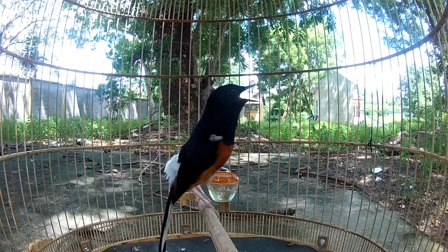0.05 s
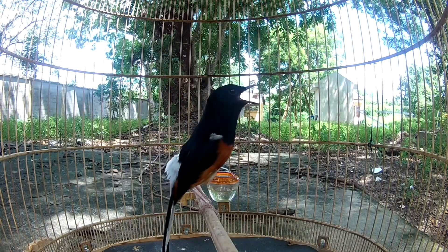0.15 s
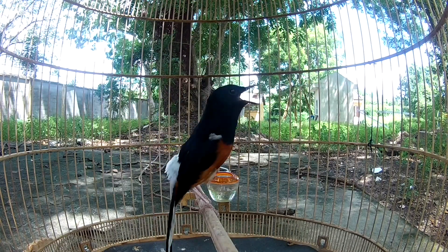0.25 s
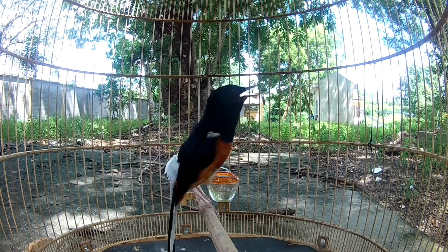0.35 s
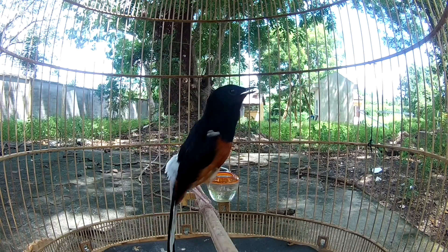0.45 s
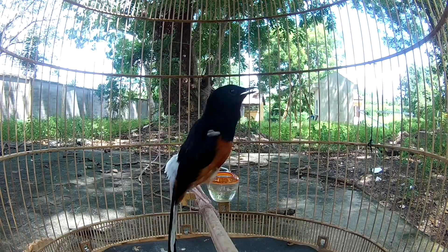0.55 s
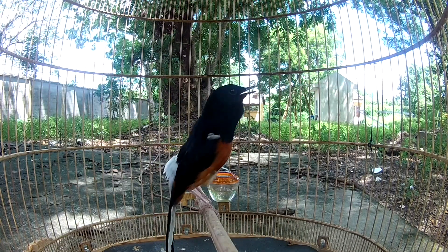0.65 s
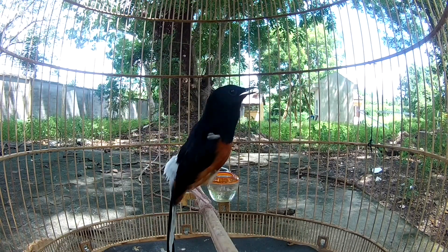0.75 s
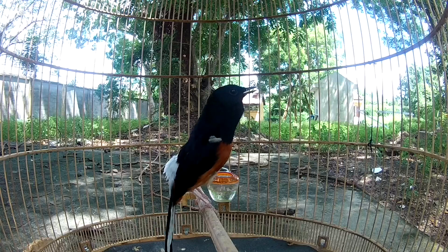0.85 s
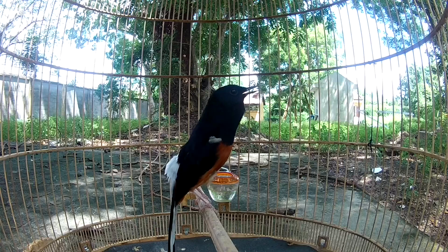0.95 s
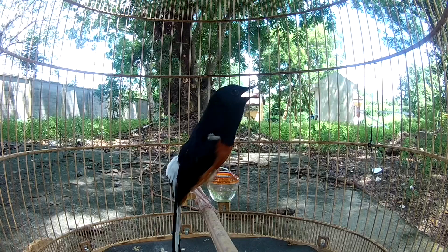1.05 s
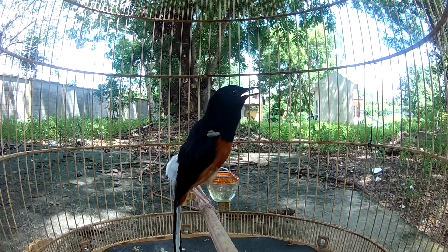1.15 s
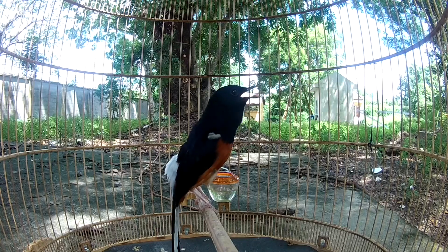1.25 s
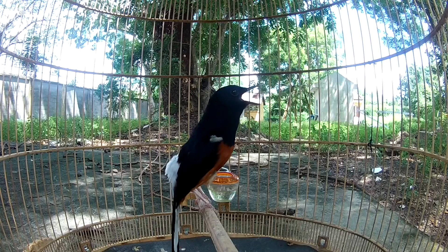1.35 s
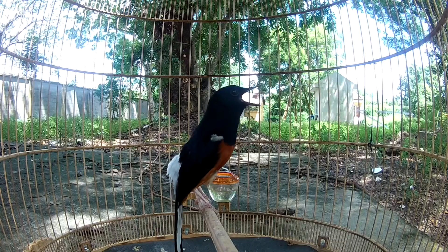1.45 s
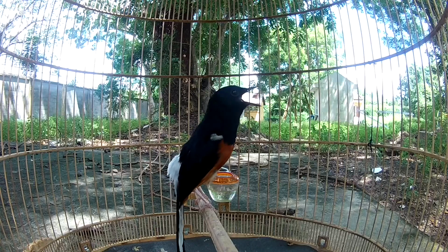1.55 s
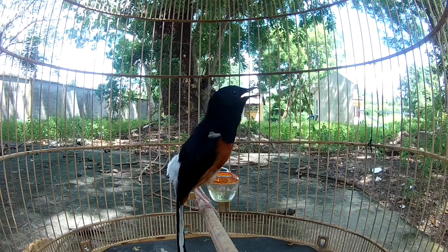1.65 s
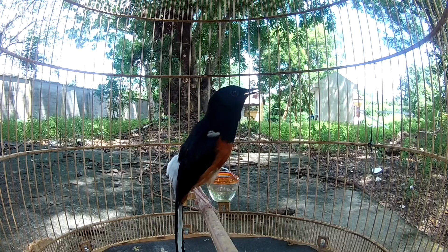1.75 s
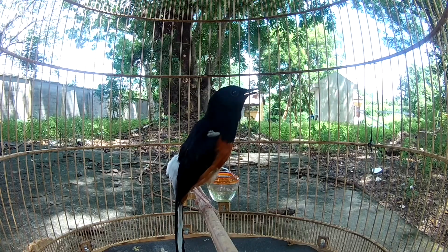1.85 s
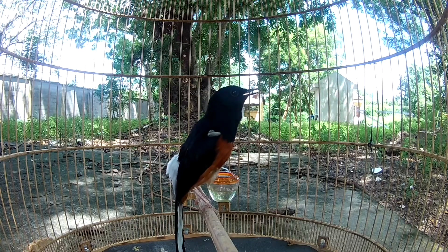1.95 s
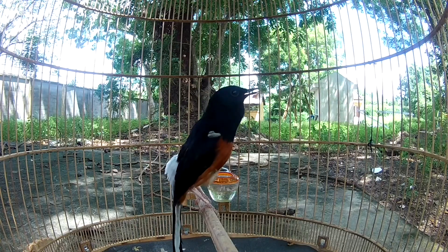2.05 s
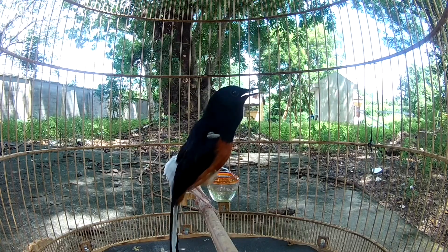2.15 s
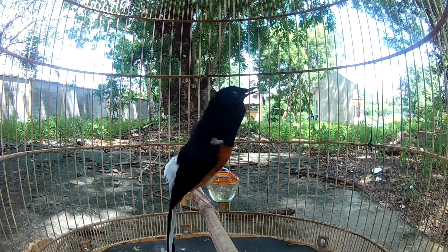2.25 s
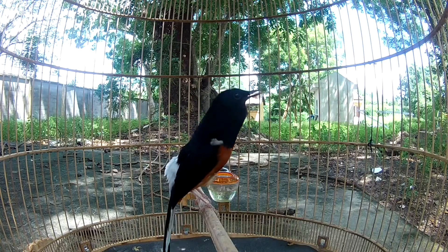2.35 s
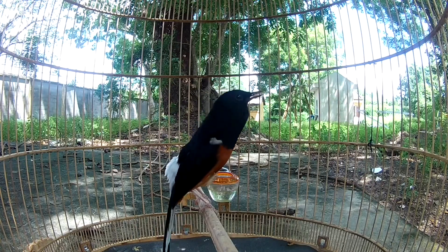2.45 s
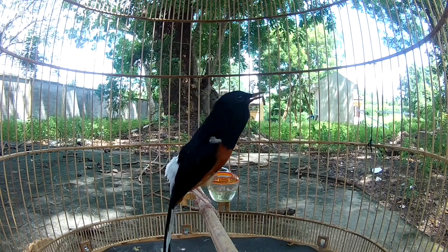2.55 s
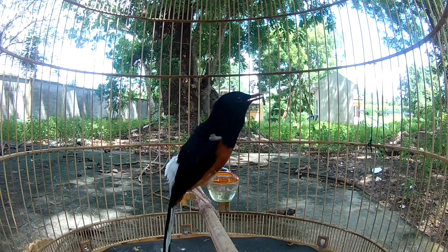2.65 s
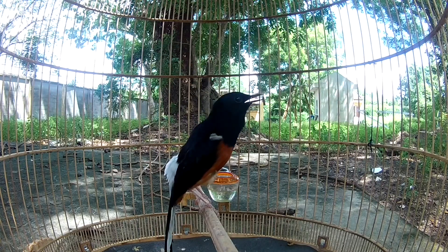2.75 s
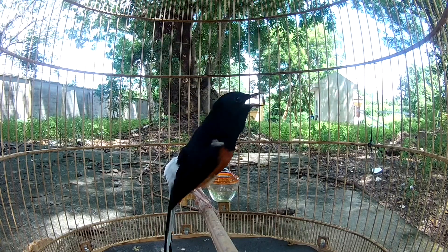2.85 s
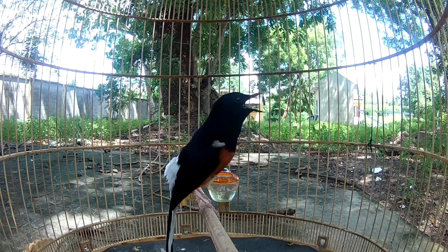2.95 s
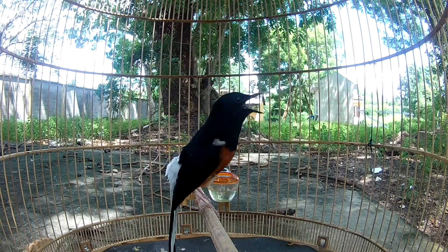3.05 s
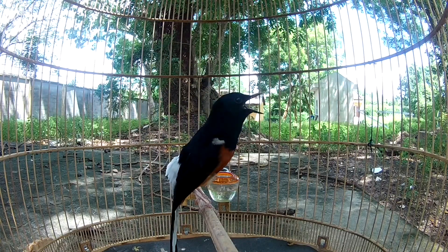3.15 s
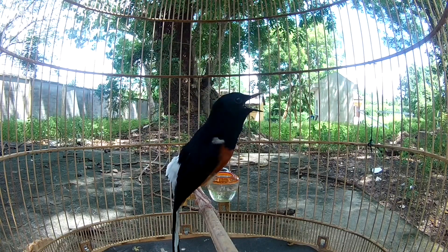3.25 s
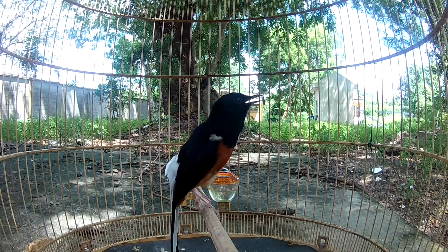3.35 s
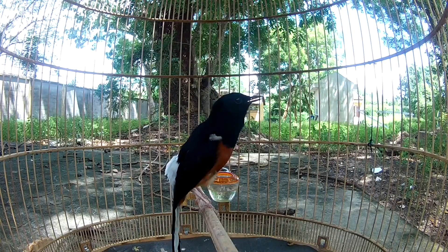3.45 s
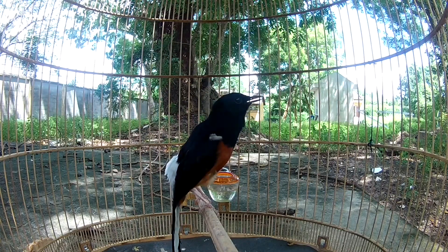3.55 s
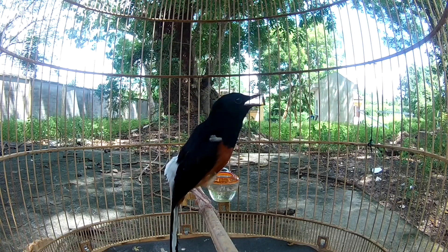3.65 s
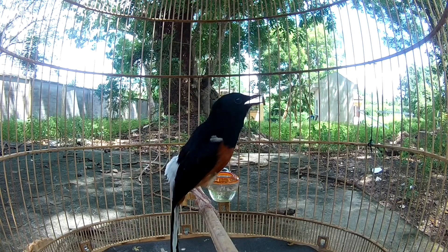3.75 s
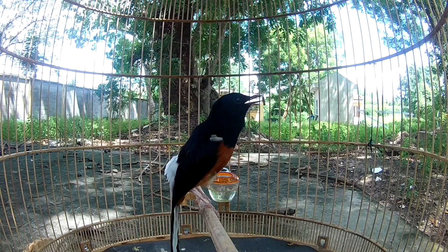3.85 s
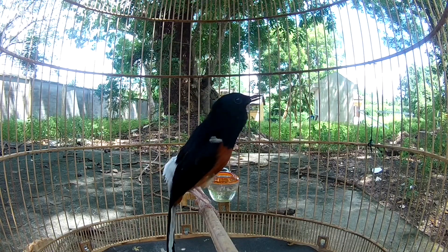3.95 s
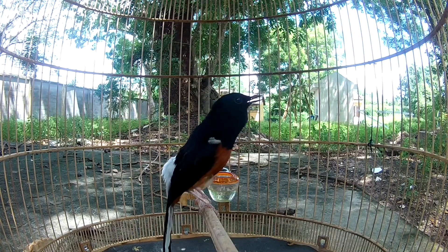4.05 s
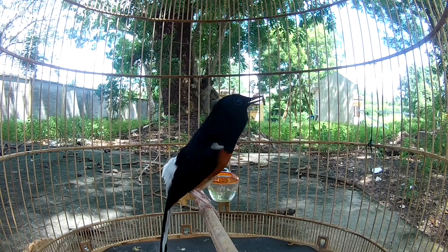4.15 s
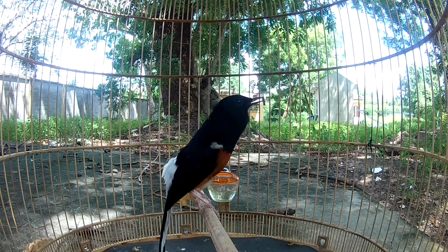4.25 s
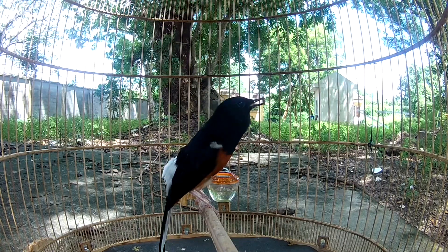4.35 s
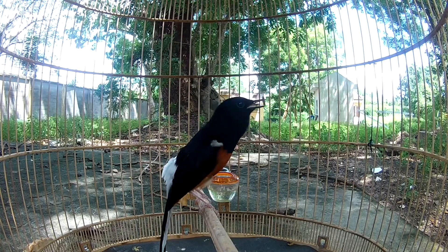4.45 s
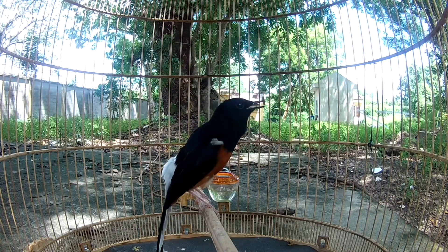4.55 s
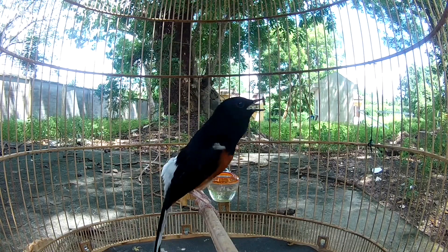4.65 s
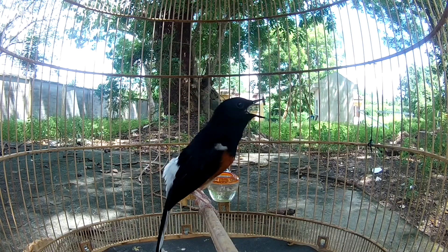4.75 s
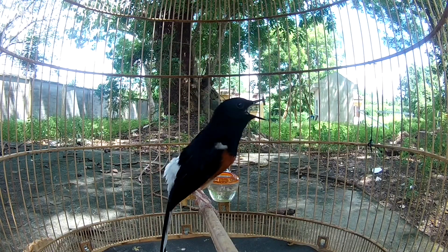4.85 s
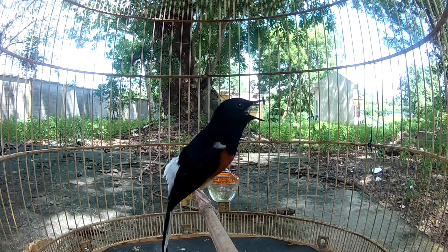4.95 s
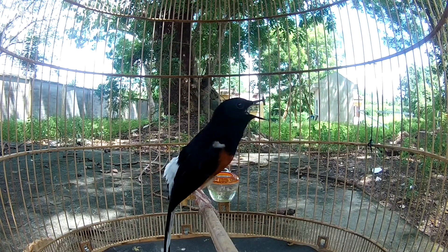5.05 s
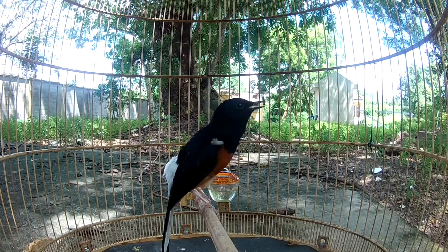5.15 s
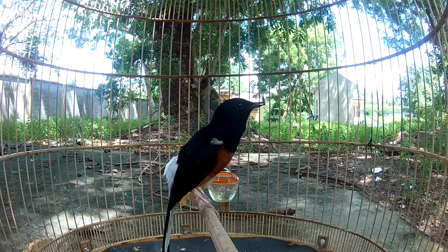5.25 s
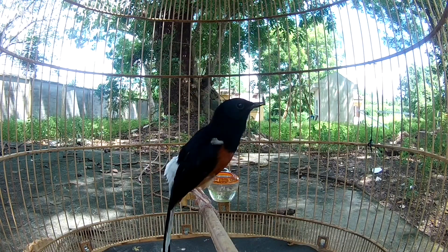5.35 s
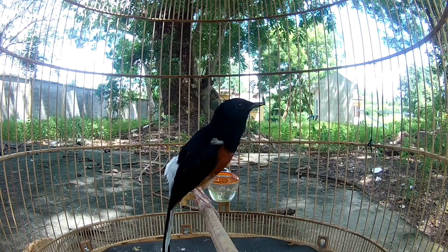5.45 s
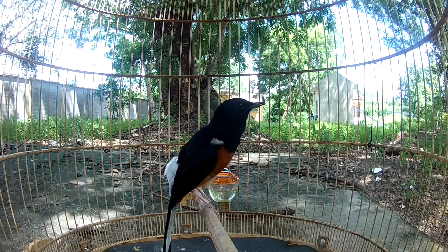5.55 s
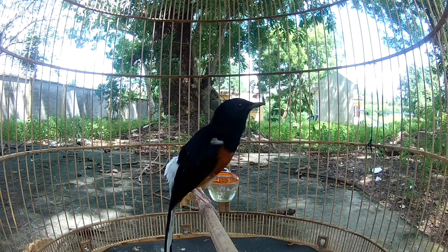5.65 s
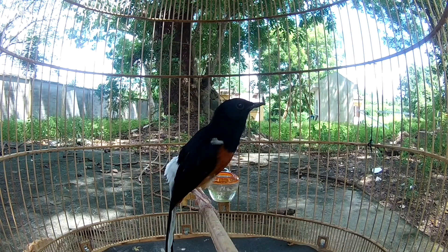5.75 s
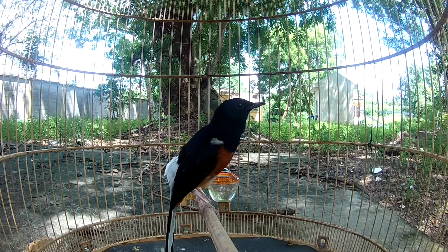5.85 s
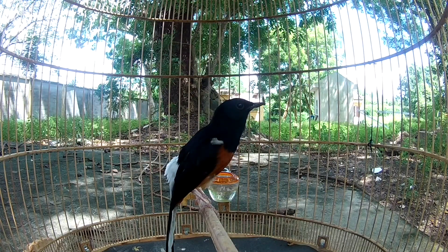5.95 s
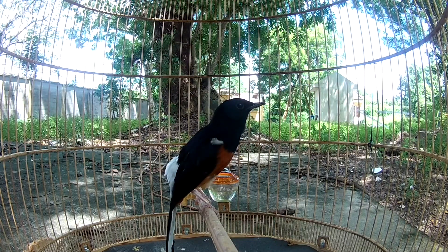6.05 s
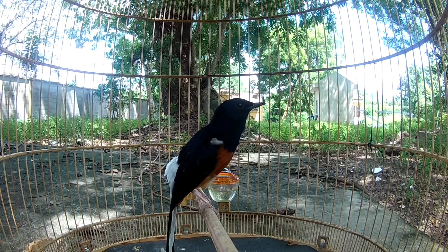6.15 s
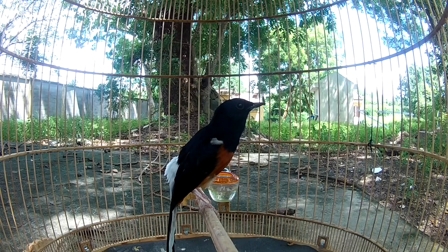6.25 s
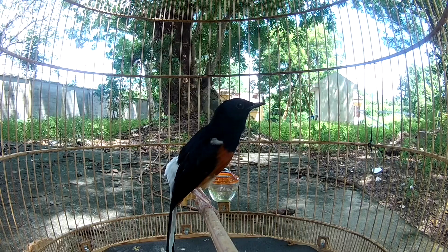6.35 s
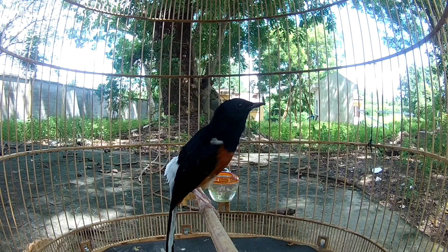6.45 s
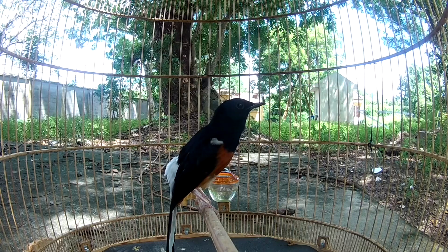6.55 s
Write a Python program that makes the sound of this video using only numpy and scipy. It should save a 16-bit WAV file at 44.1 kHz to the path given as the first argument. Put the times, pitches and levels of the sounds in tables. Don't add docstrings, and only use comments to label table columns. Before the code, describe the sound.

A songbird sings close to the microphone in a walled yard with trees, its notes trailing short diffuse echoes. The tail of a loud whistle opens, running into a quick rising trill and high zigzag warble until 0.4 s. Low, pure slurs fall and return at 0.7-1.1 s, while faint distant birds repeat a small figure until about 2 s. At 1.3 s a dipping whistle climbs into a tight trill and warble. A low cluck at 2.1 s leads to grunting, rattling chatter until 2.6 s. Another whistle, beaded trill and warble fill 2.8-3.3 s; a soft squeak comes at 3.7 s. Cluck and chatter return at 4.0-4.5 s, then the loudest whistle phrase at 4.7-5.1 s, slightly overloaded. After a pause, leaves rustle faintly from 5.7 s, and a soft, slowly rising whistle starts at 6.0 s, with a hoarse farther call at 6.4 s. A faint motor hum and low air rumble continue throughout.

```python
import sys
import numpy as np
from scipy import signal
from scipy.io import wavfile
from scipy.ndimage import uniform_filter1d

SR = 44100
rng = np.random.default_rng(int(sys.argv[2]) if len(sys.argv) > 2 else 0)


def undo_db(level):
    steps = np.asarray(level, float) / 20
    return 10 ** steps


def pcm_store(signal):
    levels = np.round(np.clip(np.atleast_2d(signal), -1, 1) * 32767)
    wavfile.write(sys.argv[1], SR, levels.astype(np.int16).T)


N = 291501
TIME = np.arange(N) / SR
YARD_DB = -24


def rms_one(x):
    return x / np.sqrt(np.mean(x ** 2) + 1e-20)


def drift(rate_hz):
    lowpass = signal.butter(4, rate_hz, fs=SR, output="sos")
    return rms_one(signal.sosfilt(lowpass, rng.standard_normal(N + SR))[SR:])


def band_noise(white, low_hz, high_hz):
    return signal.sosfilt(signal.butter(2, [low_hz, high_hz], "band", fs=SR, output="sos"), white)


def tone(hz, partials):
    phase = 2 * np.pi * np.cumsum(hz) / SR
    total = 0
    for k, height in partials:
        total = total + height * np.sin(k * phase + k * k) * (k * hz < 20000)
    return total


def motor():
    # multiple of the shaft rate, level in dB.
    harmonics = [(2, -52), (3, -68), (4, -67), (6, -70), (7, -61), (8, -57), (10, -66), (14, -68)]
    hz = 86.9 * (1 + .002 * drift(1.5))
    return tone(hz, [(k, np.sqrt(2) * undo_db(db + 1.5 * np.roll(drift(6), k))) for k, db in harmonics])


def banded_noise(spectrum, patchy_db, patch_rate_hz):
    out = 0
    edges_hz = 22 * 2 ** np.arange(0, 10, .5)
    white = rng.standard_normal((2, N + SR))
    hz, level_db = np.transpose(spectrum)
    together = drift(patch_rate_hz)
    for k, (low_hz, high_hz) in enumerate(zip(edges_hz, edges_hz[1:])):
        band = band_noise(white[k % 2], low_hz, high_hz)[SR:]
        own = np.roll(together, k * N // 19)
        band_db = np.interp(np.log(low_hz * high_hz) / 2, np.log(hz), level_db)
        out = out + band * undo_db(band_db + patchy_db * (.6 * together + own))
    return rms_one(out)


def air():
    # frequency in Hz, density in dB per Hz.
    air_colour = [(22, -14), (42, 0), (65, -1), (110, -6), (250, -12), (500, -15), (800, -15), (1050, -21),
                  (1400, -21), (2100, -28), (3200, -35), (5000, -41), (8000, -47), (14000, -46)]
    return undo_db(-53) * banded_noise(air_colour, patchy_db=.6, patch_rate_hz=5)


def throat(hz):
    # frequency in Hz, gain in dB.
    response = [(2300, 14), (3300, 0), (6500, 1), (7800, -2), (9500, -2), (11500, -9), (16000, -16)]
    corner_hz, gain_db = np.transpose(response)
    return undo_db(np.interp(np.log(hz), np.log(corner_hz), gain_db))


def glide(rows, edge_s):
    s, hz, *levels_db = np.transpose(rows)
    gate = np.clip(np.minimum(TIME - s[0] + edge_s, s[-1] + edge_s - TIME) / edge_s, 0, 1)
    on = gate > 0
    pitch_hz, *heights = [uniform_filter1d(np.interp(TIME[on], s, column), size=133, mode="nearest")
                          for column in (hz, *undo_db(np.array(levels_db)))]
    return on, pitch_hz, [gate[on] * height for height in heights]


def trill(start_s, end_s, bead_s, top_hz, joined):
    start_hz, level_db, swell_db, swell_s = 3040, -13.8, -6, .04
    gap_db, bead_arch, droop_s, droop = -24, .08, .019, .15
    on = (TIME > start_s) & (TIME < end_s)
    t = TIME[on] - start_s
    u = t / (end_s - start_s)
    apart = np.clip((joined - u) / .35, 0, 1)
    arch = np.abs(np.sin(np.pi * t / bead_s))
    cusp = 1 - np.abs(2 * (t / bead_s % 1) - 1)
    ending = np.clip(1 - (end_s - start_s - t) / droop_s, 0, 1) ** 2
    bead = bead_arch * (.45 + .65 * joined) * (cusp ** 1.6 - .45) + .006 * drift(150)[on]
    hz = start_hz + (top_hz - start_hz) * np.sin(1.4 * u)
    hz = hz * (1 + bead * (1 - .5 * u) - droop * ending)
    db = level_db + swell_db * np.clip(1 - t / swell_s, 0, 1)
    db = db + gap_db * (.07 + apart) * (1 - arch) ** 1.8
    db = db - 40 * (ending ** 4 + np.clip(1 - t / .004, 0, 1)) + .8 * drift(90)[on]
    return on, uniform_filter1d(hz, size=67), [uniform_filter1d(undo_db(db), size=67)]


def whistles(upper_power=.6, flutter_db=.5, broken_db=3):
    # time in seconds, pitch in Hz, crest in dB.
    scooped = [
        [(0, 2340, -3), (.018, 2580, -19), (.032, 2700, -23), (.06, 2740, -22), (.086, 2770, -24),
         (.101, 2800, -39), (.116, 2860, -31), (.135, 3030, -37)],
        [(1.272, 2530, -46), (1.286, 2650, -29), (1.293, 2580, -18), (1.316, 2290, -3), (1.335, 2280, .4),
         (1.367, 2490, -3.2), (1.385, 2700, -18), (1.405, 2880, -28), (1.444, 3040, -22)],
        [(2.84, 2500, -32), (2.854, 2590, -25), (2.87, 2420, -7), (2.888, 2290, -2.4), (2.905, 2320, -.9),
         (2.93, 2470, -2.0), (2.949, 2650, -11), (2.964, 2740, -17), (3.014, 2990, -31)],
        [(4.652, 2180, -50), (4.668, 2370, -19.5), (4.69, 2230, 0), (4.71, 2200, 1.8), (4.74, 2420, .5),
         (4.755, 2590, -7), (4.772, 2710, -12.4), (4.834, 2890, -28), (4.851, 3020, -24)],
    ]
    # time in seconds, pitch in Hz, crest in dB.
    slurs = [
        [(.678, 2030, -50), (.685, 2070, -26), (.7, 1910, -12.5), (.718, 1740, -15), (.729, 1610, -23),
         (.735, 1560, -9), (.741, 1420, -3.7), (.754, 1170, -12), (.768, 1120, -35)],
        [(.864, 1700, -35), (.885, 1630, -25), (.91, 1450, -4.5), (.937, 1170, -6.2), (.966, 1130, -11),
         (1.005, 1500, -5.0), (1.018, 1580, -8.0), (1.059, 1630, -8.8), (1.071, 1740, -24)],
        [(1.071, 1740, -24), (1.084, 1750, -8.3), (1.093, 2010, -2.5), (1.098, 2400, -18), (1.104, 2190, -1.9),
         (1.109, 2100, -30)],
    ]
    # start and end in seconds, bead in seconds, top in Hz, share before beads join.
    trills = [
        (.14, .221, .0197, 3420, .1),
        (1.449, 1.549, .017, 3600, 0.05),
        (3.0185, 3.183, .0185, 3800, .85),
        (4.855, 5.012, .0192, 3720, .72),
    ]
    # multiple of pitch, level in dB.
    whistle_partials = [(1, 0), (2, -52), (3, -63), (4, -60), (5, -66)]
    out = np.zeros(N)
    flutter = undo_db(.3 + flutter_db * drift(70))
    broken = broken_db * drift(60)
    stutter_db = -22 * np.sin(np.pi * 70 * TIME) ** 2
    notes = [glide(rows, edge_s=.003) for rows in scooped + slurs] + [trill(*row) for row in trills]
    for on, hz, (main,) in notes:
        opening_db = np.clip((hz - 2900) / 60, 0, 6)
        partials = []
        for k, db in whistle_partials:
            overtone_db = db + opening_db + np.roll(broken, 999 * k)[on]
            upper = main ** upper_power * throat(k * hz) * undo_db(overtone_db)
            partials.append((k, main if db == 0 else upper))
        tail = np.clip(1 - main / .11, 0, 1) * np.clip((hz - 2700) / 150, 0, 1)
        unsteady = flutter[on] ** np.clip(1.5 - main, 0, 1)
        out[on] += unsteady * tone(hz, partials) * undo_db(stutter_db[on] * tail)
    return out


def yard(x):
    quick_t60_s, slow_t60_s, slow_db, gap_s = .36, 1.2, -36, .011
    t = np.arange(int(1.5 * SR)) / SR
    quick, slow = (rms_one(undo_db(-60 * t / t60_s)) / np.sqrt(len(t)) for t60_s in (quick_t60_s, slow_t60_s))
    onset = np.clip(t / gap_s - 1, 0, 1)
    response = rng.standard_normal(len(t)) * onset * (quick + undo_db(slow_db - YARD_DB) * slow)
    response = signal.lfilter(*signal.butter(1, 1100, "high", fs=SR), response)
    return signal.fftconvolve(x, response)[:N]


def puffs(rows, partials, stretch, crest, roundness, upper_power, rough=0, rasp_db=0):
    hz, swell = np.zeros(N), np.zeros(N)
    for s, length_s, start_hz, middle_hz, end_hz, crest_db in rows:
        first = max(int((s - stretch * length_s) * SR), 0)
        at = slice(first, min(int((s + (1 + stretch) * length_s) * SR), N))
        u = np.clip(2 * (TIME[at] - s) / length_s - 1, -1, 1)
        pitch_hz = middle_hz + (end_hz - start_hz) / 2 * u + ((start_hz + end_hz) / 2 - middle_hz) * u * u
        through = np.linspace(0, 1, len(u)) ** (np.log(.5) / np.log(np.clip(crest, .1, .9)))
        shape = undo_db(crest_db) * np.abs(np.sin(np.pi * through)) ** roundness
        hz[at] = np.where(shape > swell[at], pitch_hz, hz[at])
        swell[at] = np.maximum(shape, swell[at])
    on = swell > 0
    hz = uniform_filter1d(np.interp(TIME, TIME[on], hz[on]), size=89) * (1 + rough * drift(250))
    top = swell.max()
    rasp = rasp_db * drift(380)
    upper = uniform_filter1d(top * (swell / top) ** upper_power, size=133)
    swell = uniform_filter1d(swell, size=67)
    heights = []
    for k, db in partials:
        if k == 1:
            height = swell * undo_db(rasp + db)
        else:
            weak = db < 0
            height = upper * throat(k * hz) ** weak * undo_db(db + 2.5 * weak * np.roll(rasp, 99 * k))
        heights.append((k, height))
    return tone(hz, heights)


def zigzags():
    # start in seconds, length in seconds, bottom in Hz, crest in dB.
    scoops = [(.2205, .009, 2630, -26), (.2749, .0175, 2050, -16.5), (.3292, .018, 2080, -18),
              (1.549, .01, 2430, -21), (1.6034, .0125, 2260, -19), (3.18, .009, 2850, -24),
              (3.233, .0185, 2080, -19), (3.2898, .006, 2350, -28), (5.0111, .021, 2100, -17),
              (5.0665, .022, 2090, -18)]
    # start in seconds, length in seconds, top in Hz, crest in dB.
    rises = [(.2325, .0334, 4070, -12.3), (.2943, .026, 4350, -15.3), (.3497, .025, 3950, -16),
             (1.561, .0314, 4200, -13), (1.6183, .026, 4200, -15.6), (3.1901, .0309, 4150, -13),
             (3.2529, .026, 4400, -14.4), (5.0326, .021, 4000, -13), (5.0889, .019, 3900, -16)]
    # start in seconds, top in Hz, crest in dB.
    falls = [(.2664, 3950, -15), (.3208, 4320, -18.4), (1.5929, 4270, -15.6), (3.2215, 4300, -15.3),
             (3.2809, 4290, -19), (5.055, 4170, -16)]
    # start in seconds, top in Hz, crest in dB.
    flicks = [
        (1.645, 5000, -34),
        (5.108, 4800, -36),
    ]
    # multiple of pitch, level in dB.
    warble_partials = [(1, 0), (2, -43), (3, -50), (4, -53)]
    rise_start_hz, shelf_hz, climb_db = 3060, 3470, -6
    fall_s, fall_end_hz, flick_s = .0095, 3120, .014
    scoop_in_hz, scoop_out_hz, scoop_least = 2640, 2830, 1.11
    up, climbs, down = [], [], []
    for s, length_s, hz, db in rises:
        up.append((s, .7 * length_s, rise_start_hz, .985 * shelf_hz, shelf_hz, db))
        climbs.append((s + .55 * length_s, .5 * length_s, shelf_hz, (shelf_hz + hz) / 2, hz, db + climb_db))
    up += climbs
    for s, hz, db in flicks:
        up.append((s, flick_s, .87 * hz, hz, .88 * hz, db))
    for s, length_s, hz, db in scoops:
        least_hz = scoop_least * hz
        down.append((s, length_s, max(scoop_in_hz, least_hz), hz, max(scoop_out_hz, least_hz), db))
    for s, hz, db in falls:
        down.append((s, fall_s, hz, (hz + fall_end_hz) / 2, fall_end_hz, db))
    rising = puffs(up, warble_partials, stretch=.07, crest=.4, roundness=.8, upper_power=.45,
                   rough=.006, rasp_db=.7)
    falling = puffs(down, warble_partials, stretch=.04, crest=.6, roundness=.55, upper_power=.45,
                    rough=.005, rasp_db=.6)
    return rising + falling


def far_birds():
    # offset in seconds, length in seconds, start, middle and end pitch in Hz, crest in dB.
    far_figure = [
        (0, .022, 5200, 4400, 3900, -56),
        (.135, .05, 2400, 2480, 2700, -55),
        (.183, .036, 2750, 3300, 2850, -51),
    ]
    figure_starts_s = [.623, 1.028, 1.432, 1.846]
    # start in seconds, length in seconds, start, middle and end pitch in Hz, crest in dB.
    far_calls = [
        (6.39, .03, 2700, 3400, 3800, -39),
        (6.41, .068, 3700, 3880, 3900, -31),
        (5.7, .06, 4000, 4150, 4000, -65),
        (5.95, .2, 2650, 2720, 2740, -60),
    ]
    figure = [(at + s, *shape, crest_db) for at in figure_starts_s for s, *shape, crest_db in far_figure]
    clear = puffs(figure, [(1, 0)], stretch=.1, crest=.5, roundness=.8, upper_power=1, rough=.004)
    hoarse = puffs(sorted(far_calls), [(1, 0)], stretch=.1, crest=.55, roundness=.8, upper_power=1,
                   rough=.028, rasp_db=2.2)
    return clear + hoarse


def clucks():
    # start in seconds, length in seconds, start, middle and end pitch in Hz, crest in dB.
    cluck_rows = [
        (2.103, .052, 520, 620, 530, -24),
        (3.985, .05, 560, 620, 540, -22),
        (6.008, .02, 560, 560, 540, -46),
    ]
    # multiple of pitch, level in dB.
    cluck_partials = [(1, -19), (2, 0), (3, -34), (4, -36)]
    return puffs(cluck_rows, cluck_partials, stretch=.05, crest=.55, roundness=1.1, upper_power=.9,
                 rough=.025, rasp_db=1.3)


def chatter_puffs():
    # high voice start and low voice start in seconds, tick spacing in seconds, crest in dB.
    openings = [
        (2.2345, 2.2659, .0132, -5.4),
        (4.111, 4.1409, .0137, -6.3),
    ]
    # start in seconds, low puff count, spacing in seconds, low and high voice levels in dB.
    bursts = [
        (2.3727, 2, .0249, -6.2, -17),
        (2.4345, 2, .0245, -7.7, -16),
        (2.4934, 2, .029, -9, -14),
        (2.5323, 4, .0215, -9.5, -21),
        (4.2512, 2, .024, -8.3, -13.7),
        (4.3105, 2, .025, -9.5, -13),
        (4.3689, 5, .0222, -11, -12),
    ]
    low_hz, high_hz, low_fade_db, high_fade_db, high_lag = 1095, 1550, 3.5, 8.0, .45
    tick_wait_s, tick_db, pip_db, pip_echo_s, pip_echo_db = .0335, -12, -5, .0217, -16
    low, high = [], []
    for pip_s, grunt_s, spacing_s, db in openings:
        high.append((pip_s, .02, .93 * high_hz, 1.035 * high_hz, 1.075 * high_hz, db + pip_db))
        high.append((pip_s + pip_echo_s, .0075, 1.07 * high_hz, 1.05 * high_hz, 1.06 * high_hz, db + pip_echo_db))
        low.append((grunt_s, .013, 1.19 * low_hz, 1.02 * low_hz, 1.02 * low_hz, db))
        low.append((grunt_s + spacing_s, .013, 1.08 * low_hz, 1.02 * low_hz, .98 * low_hz, db - 1.3))
        ticks_s = grunt_s + tick_wait_s
        for k in range(4):
            low.append((ticks_s + k * spacing_s, .007, 1.13 * low_hz, 1.06 * low_hz, 1.06 * low_hz, db + tick_db))
        for k in range(5):
            high.append((ticks_s + (k + .4) * spacing_s, .012, high_hz, high_hz, 1.04 * high_hz, db + 2 * tick_db))
    for s, count, spacing_s, low_db, high_db in bursts:
        for k in range(count):
            middle_hz = low_hz * (1.05 if k else .98)
            last = k == count - 1
            length_s = .0175 if k == 0 else .0115 if count < 3 else .021
            puff_db = low_db - low_fade_db * k / (count - 1)
            low.append((s + k * spacing_s, length_s, 1.19 * low_hz, middle_hz, 1.02 * low_hz, puff_db))
            fill_db = high_db - high_fade_db * last * (count - 1) - 1.2 * k
            fill_s = s + (k + high_lag) * spacing_s
            high.append((fill_s, .016, .96 * high_hz, high_hz, .975 * high_hz, fill_db))
    return low, high


def chatter(cluck_sound):
    # multiple of pitch, level in dB.
    low_partials = [(1, 0), (2, -36), (3, -49), (4, -55), (8, -57)]
    # multiple of pitch, level in dB.
    high_partials = [(1, 0), (2, -43), (3, -46)]
    low_puffs, high_puffs = chatter_puffs()
    low = puffs(low_puffs, low_partials, stretch=.06, crest=.25, roundness=1.1, upper_power=.9,
                rough=.016, rasp_db=1.2)
    high = puffs(high_puffs, high_partials, stretch=.04, crest=.3, roundness=.8, upper_power=.85,
                 rough=.008, rasp_db=.8)
    hiss = undo_db(8) * band_noise(rng.standard_normal(N), 1500, 2400)
    hiss += undo_db(1) * band_noise(rng.standard_normal(N), 3800, 4600)
    breath = undo_db(-32) * hiss * uniform_filter1d(np.abs(low + high + cluck_sound), size=89)
    return signal.sosfilt(signal.butter(6, 930, "high", fs=SR, output="sos"), low + high + breath)


def squeak():
    # start in seconds, length in seconds, start, middle and end pitch in Hz, crest in dB.
    squeak_rows = [
        (3.6755, .01, 1630, 2310, 2800, -32),
        (3.6865, .0135, 2800, 3000, 2950, -39),
        (3.7024, .0354, 2650, 2110, 3010, -26.4),
        (3.749, .02, 2910, 2480, 1860, -39),
    ]
    # multiple of pitch, level in dB.
    squeak_partials = [(1, 0), (2, -17), (3, -40)]
    return puffs(squeak_rows, squeak_partials, stretch=.1, crest=.5, roundness=1.1, upper_power=.5,
                 rough=.004, rasp_db=.6)


def leaves():
    # time in seconds, level in dB.
    gust = [
        (0, -90),
        (5.6, -88),
        (5.75, -57),
        (5.95, -54),
        (6.61, -53),
    ]
    # frequency in Hz, density in dB per Hz.
    leaf_colour = [(70, 13), (200, -3), (1500, -15), (3000, -30), (8000, -38), (15000, -32)]
    level = undo_db(np.interp(TIME, *np.transpose(gust)))
    return level * banded_noise(leaf_colour, patchy_db=2.5, patch_rate_hz=15)


def soft_whistle(waver=.005, flutter_db=.7, breaks_s=6.34, broken_db=3.5):
    # time in seconds, pitch in Hz, crest in dB, octave partial in dB.
    soft_note = [(6.008, 2220, -42, -82), (6.07, 2260, -24.4, -76), (6.187, 2340, -20.5, -63),
                 (6.272, 2420, -19.8, -56), (6.3, 2480, -27, -52), (6.322, 2420, -22, -53),
                 (6.4, 2520, -30, -49), (6.53, 2620, -30, -48), (6.56, 2640, -46, -85)]
    # multiple of pitch, level in dB.
    soft_partials = [(3, -48), (5, -52)]
    out = np.zeros(N)
    on, hz, (main, octave) = glide(soft_note, edge_s=.003)
    unsteady_db = np.interp(TIME[on], [breaks_s, breaks_s + .06], [flutter_db, broken_db])
    partials = [(1, main * undo_db(unsteady_db * drift(40)[on])), (2, octave)]
    partials += [(k, main * undo_db(db)) for k, db in soft_partials]
    out[on] = tone(hz * (1 + waver * drift(40)[on]), partials)
    return out


def songbird():
    cluck_sound = clucks()
    return whistles() + zigzags() + cluck_sound + chatter(cluck_sound) + squeak() + soft_whistle()


def scene():
    near, far = songbird(), far_birds()
    earlier = undo_db(-4) * np.sin(2 * np.pi * 2250 * TIME) * np.clip(1 - TIME / .03, 0, 1)
    sent = undo_db(YARD_DB) * (near + earlier) + undo_db(-2) * far
    echoes = yard(sent * np.clip(TIME / .01, 0, 1))
    return (near + far + echoes + leaves() + air() + motor())[None]


def top_cut(x):
    return signal.sosfilt(signal.butter(12, 15870, fs=SR, output="sos"), x)


def record(dry):
    return top_cut(dry)


dry = scene()
out = record(dry)
pcm_store(out)
```